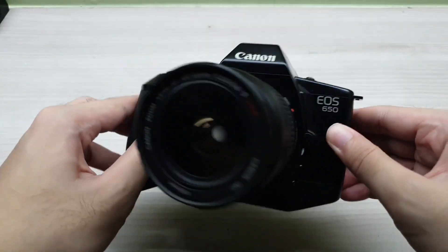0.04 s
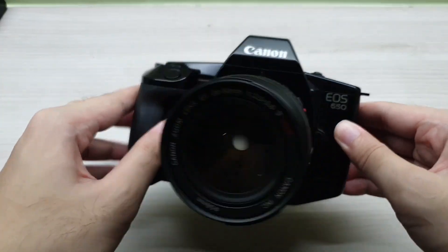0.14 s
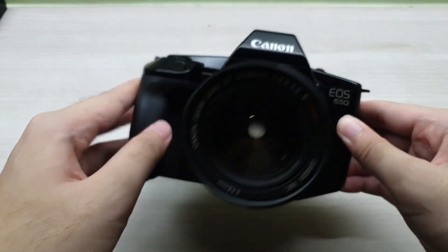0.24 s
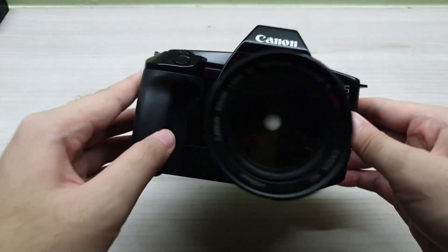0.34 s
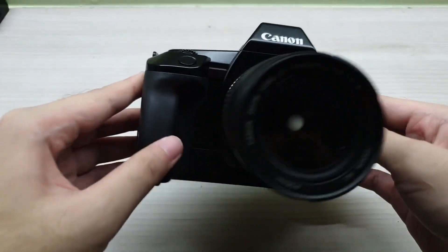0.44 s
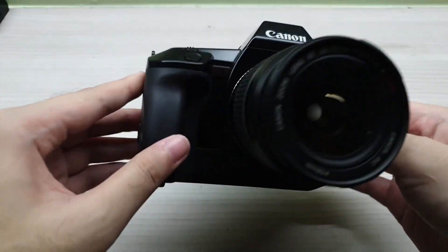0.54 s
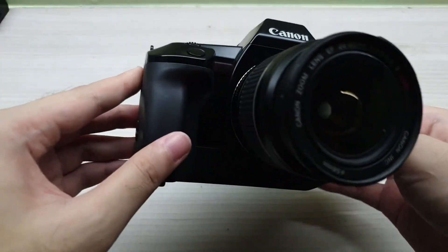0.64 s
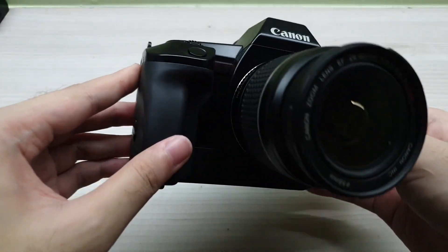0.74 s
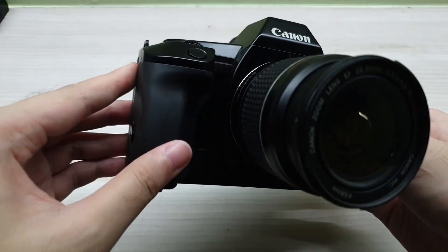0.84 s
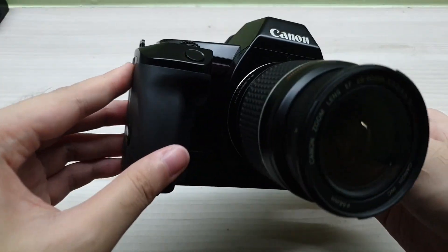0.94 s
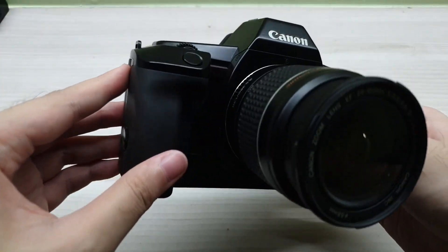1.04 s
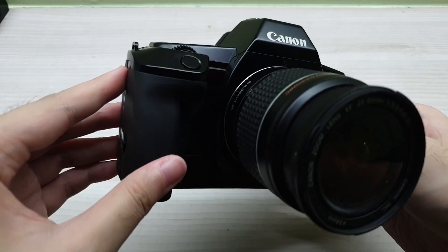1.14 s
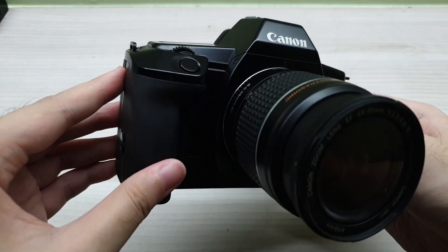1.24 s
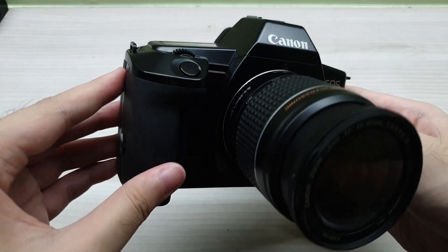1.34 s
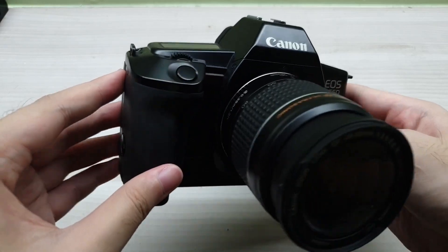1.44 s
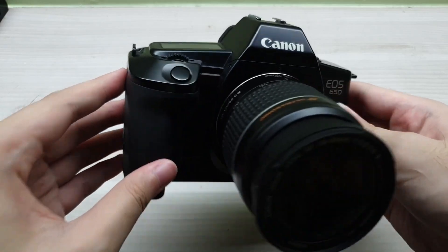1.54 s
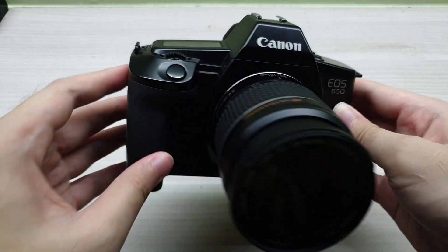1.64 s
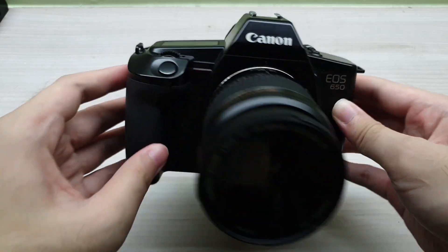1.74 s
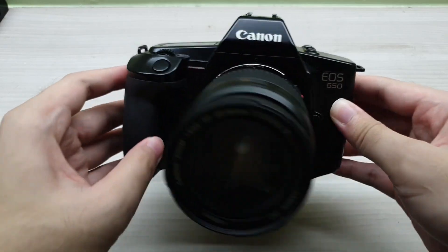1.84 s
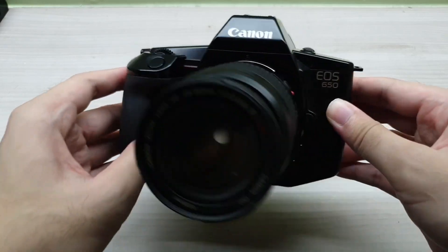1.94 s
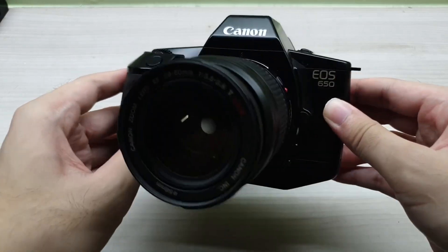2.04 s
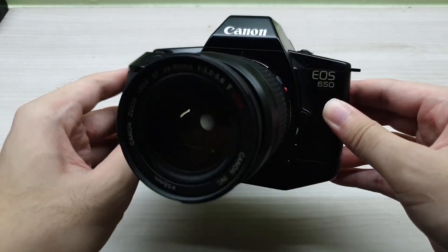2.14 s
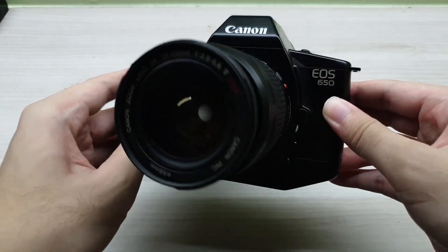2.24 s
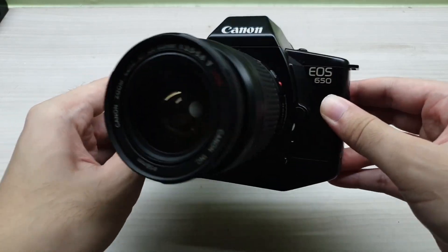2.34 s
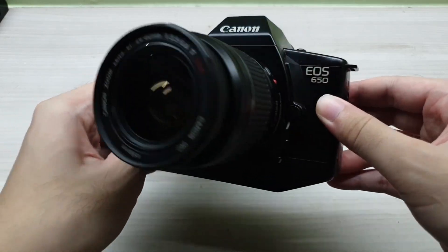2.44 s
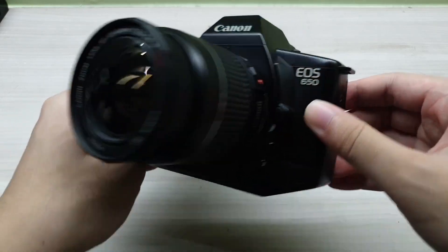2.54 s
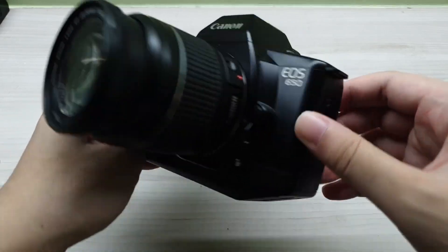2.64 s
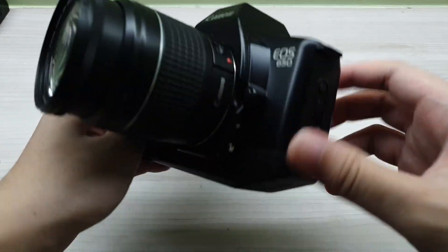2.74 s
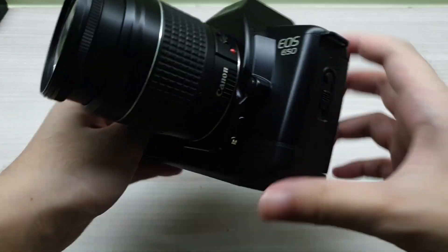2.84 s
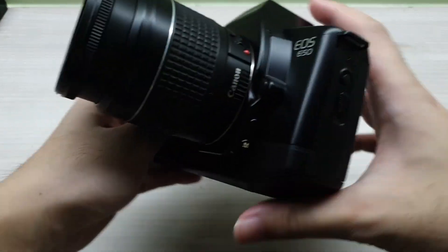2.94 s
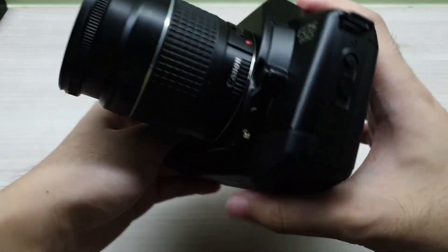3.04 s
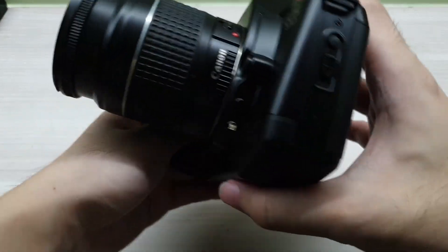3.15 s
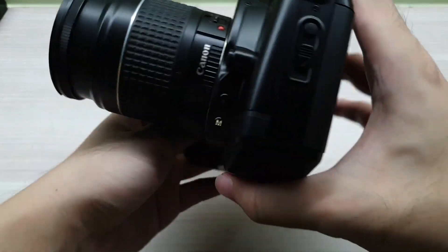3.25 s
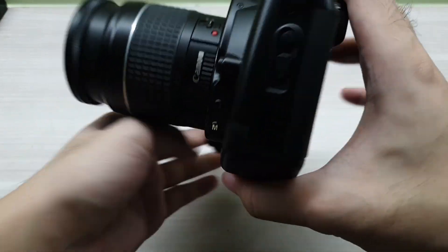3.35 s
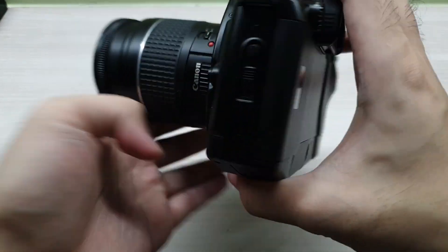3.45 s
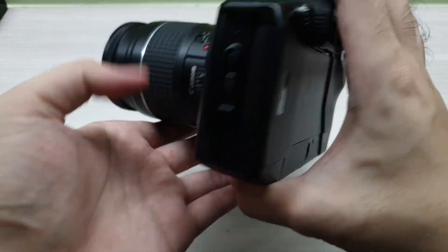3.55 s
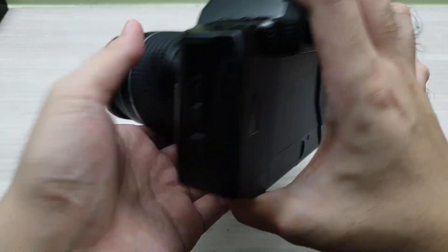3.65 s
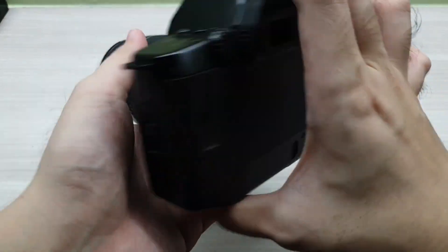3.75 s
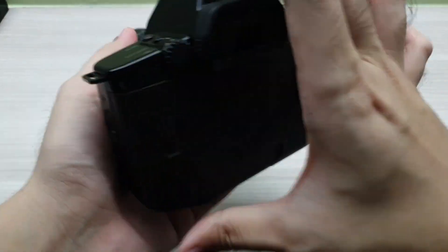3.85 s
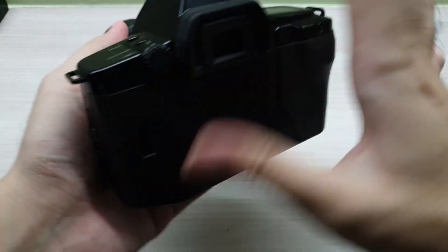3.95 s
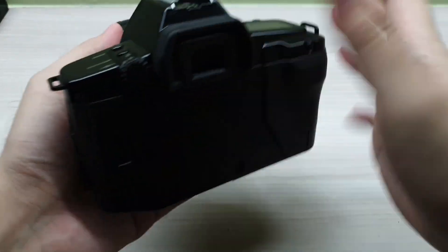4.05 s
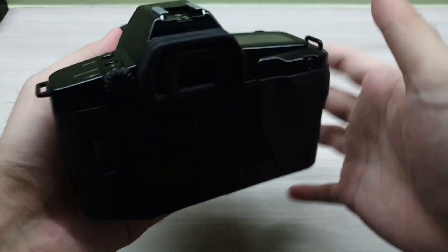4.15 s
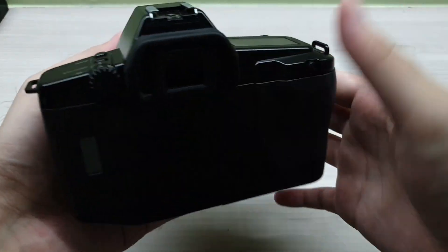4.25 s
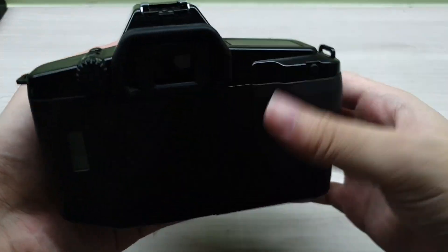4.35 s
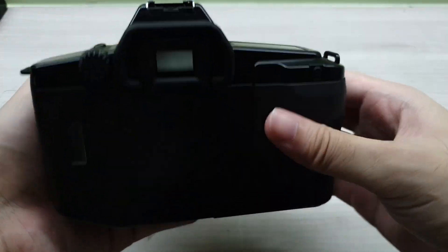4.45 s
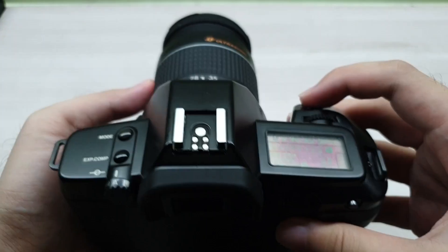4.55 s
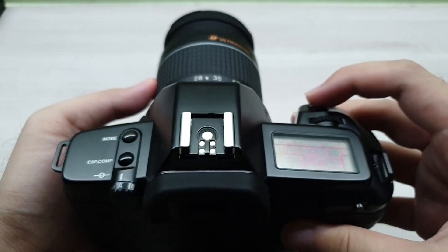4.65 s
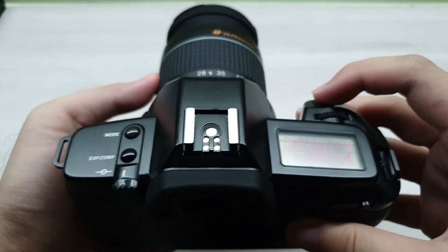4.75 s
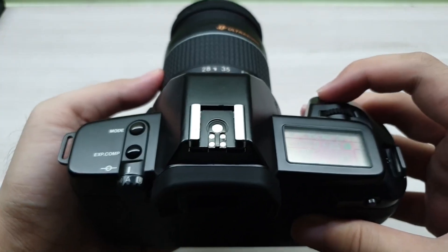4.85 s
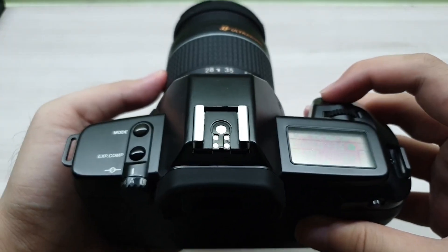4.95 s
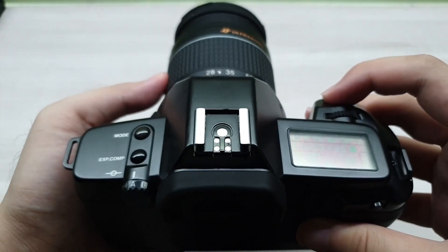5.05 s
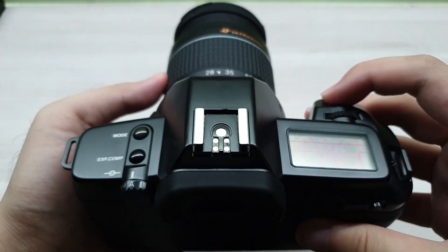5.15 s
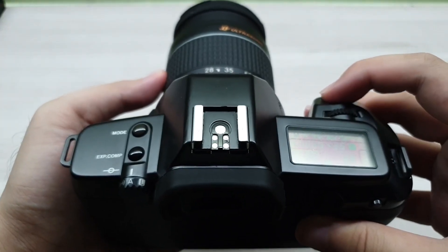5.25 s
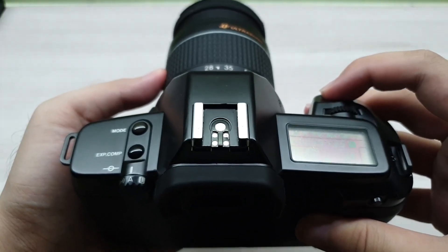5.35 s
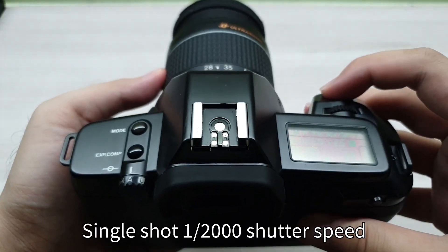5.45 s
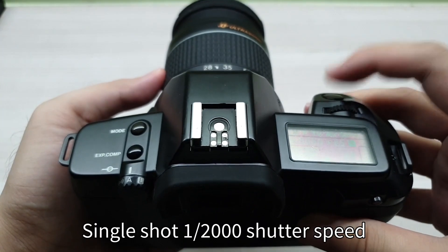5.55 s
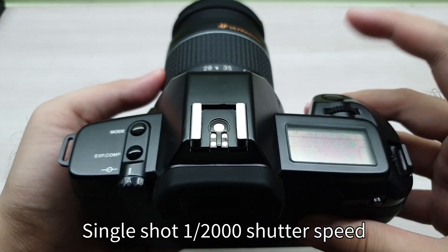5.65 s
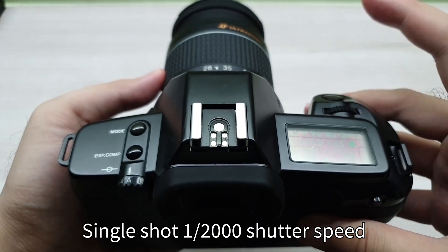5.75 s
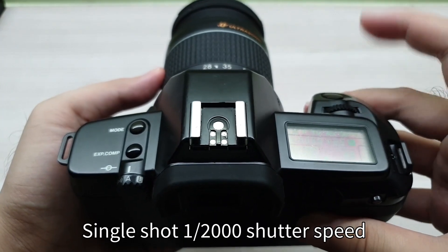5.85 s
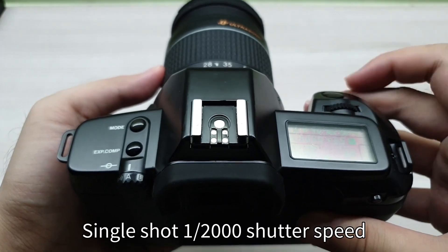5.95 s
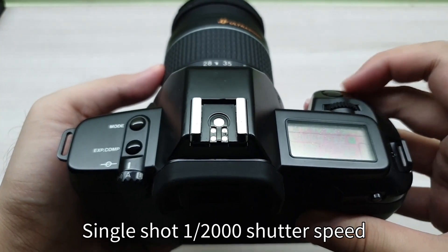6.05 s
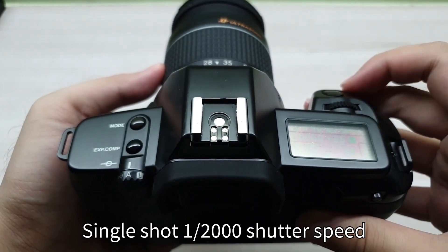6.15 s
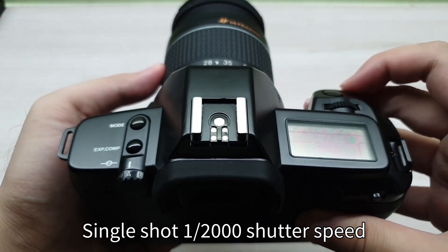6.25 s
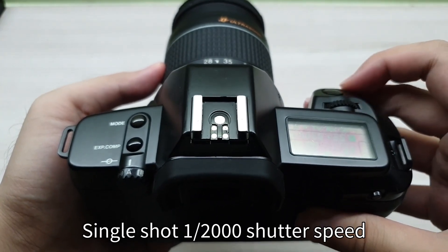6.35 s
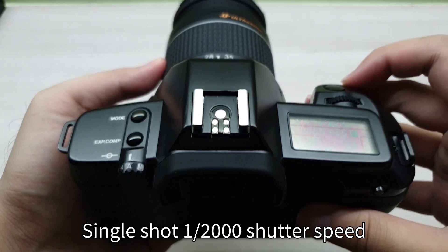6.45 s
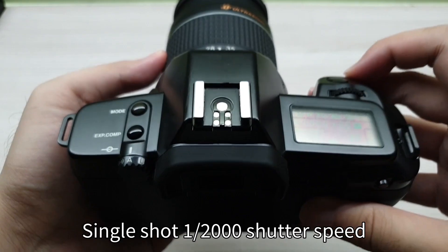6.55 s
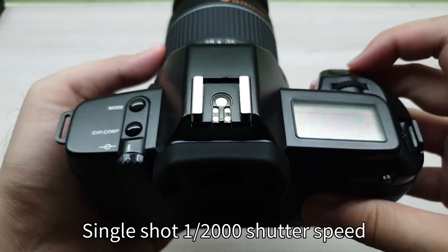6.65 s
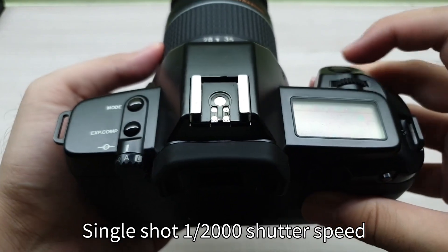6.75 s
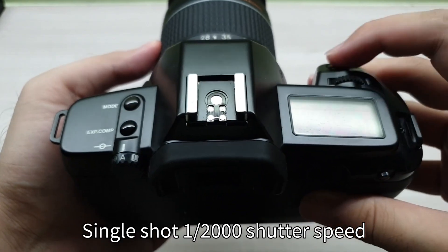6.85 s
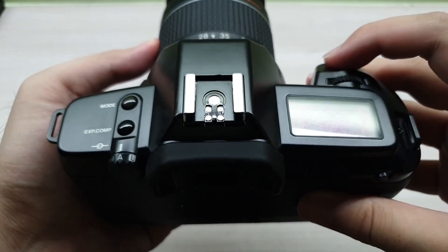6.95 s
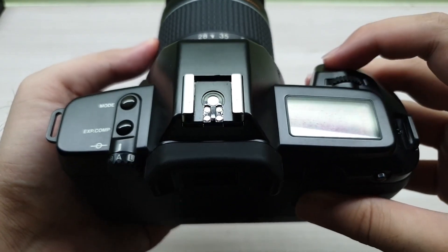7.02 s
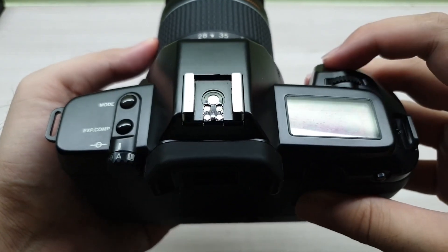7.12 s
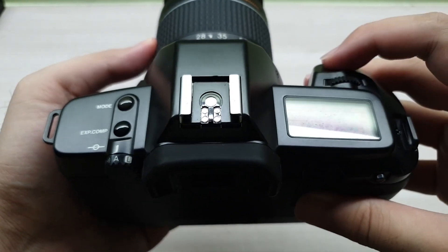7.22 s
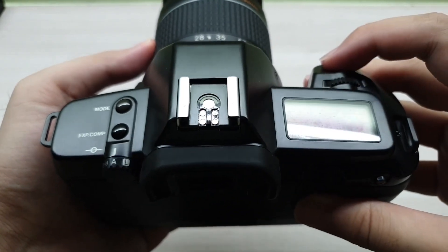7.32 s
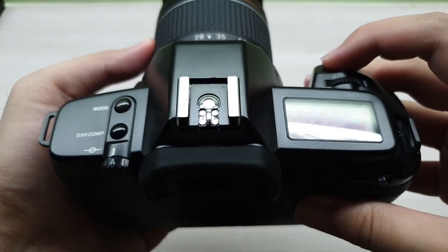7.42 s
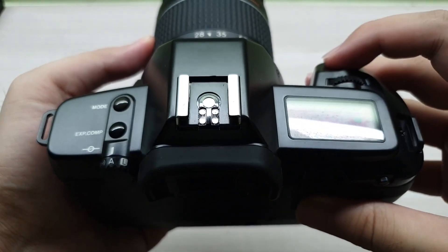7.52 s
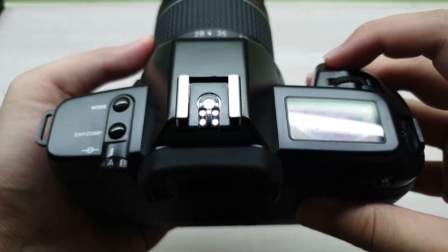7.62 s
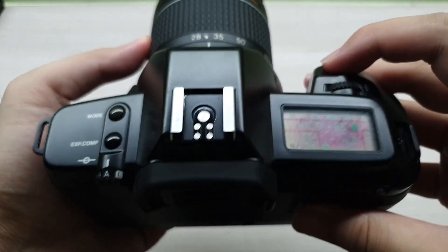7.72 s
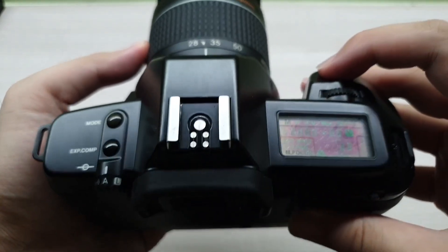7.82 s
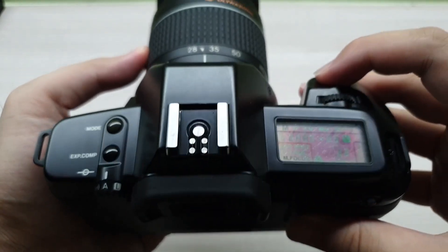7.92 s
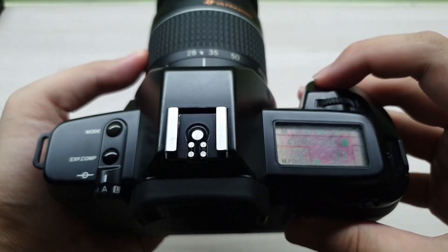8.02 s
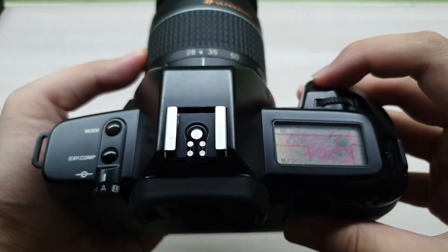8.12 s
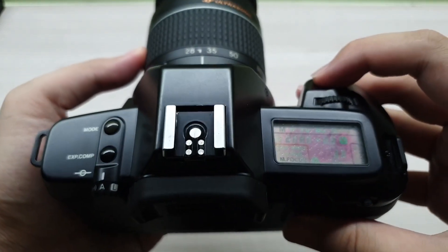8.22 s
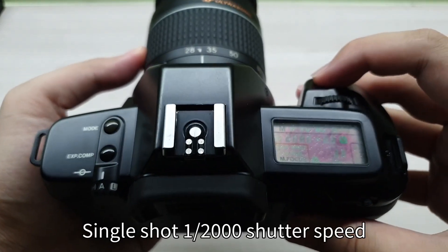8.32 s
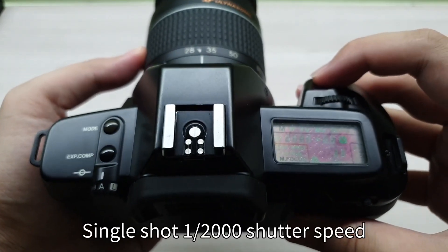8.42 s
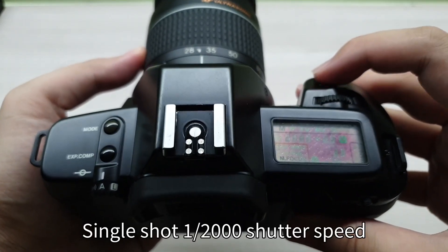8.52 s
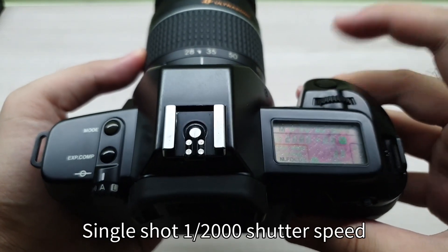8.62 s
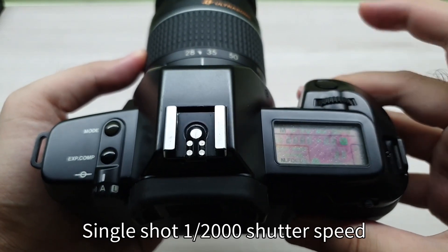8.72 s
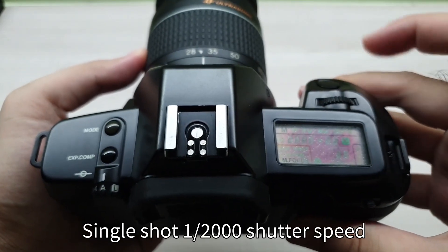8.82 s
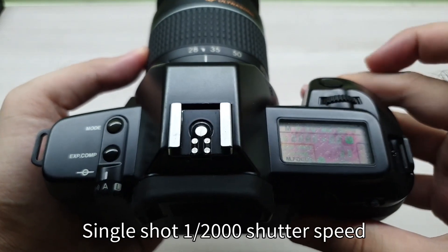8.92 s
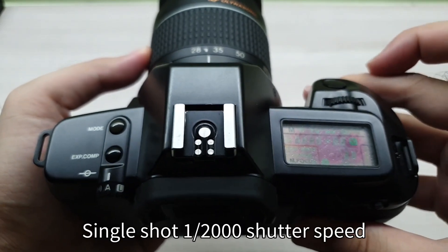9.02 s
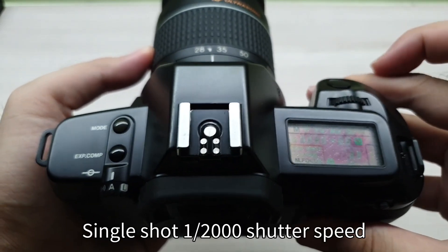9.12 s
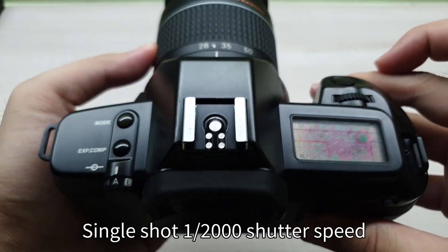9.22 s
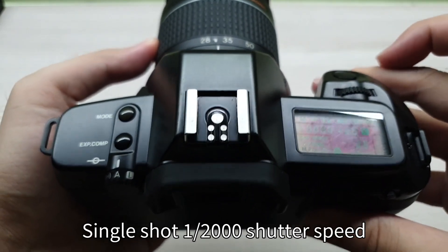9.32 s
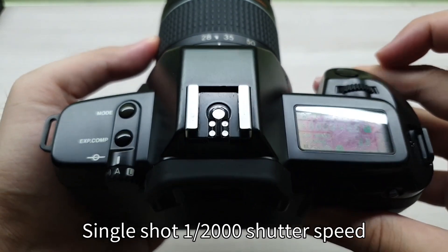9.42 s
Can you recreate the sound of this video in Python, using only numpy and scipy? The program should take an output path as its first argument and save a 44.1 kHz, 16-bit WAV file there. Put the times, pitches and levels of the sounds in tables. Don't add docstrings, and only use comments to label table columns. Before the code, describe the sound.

Close skin rubs, creaks and ticks on a camera body give way to two sharp, motorized shutter bursts about three seconds apart.

```python
import sys
import numpy as np
from scipy import signal
from scipy.fft import rfft, irfft, next_fast_len
from scipy.io import wavfile
from scipy.ndimage import uniform_filter1d

SR = 44100
rng = np.random.default_rng(int(sys.argv[2]) if len(sys.argv) > 2 else 0)


def level_to_linear(level):
    exponent = np.asarray(level, float) / 20
    return 10 ** exponent


def unload_wav(signal):
    wavfile.write(
        sys.argv[1],
        SR,
        np.round(np.clip(np.atleast_2d(signal).T, -1, 1) * 32767).astype(np.int16),
    )


N = 417911
TIME = np.arange(N) / SR

# (time [s], motor level [dB])
RELEASES = [
    (5.395, 1),
    (8.3546, 0.5),
]


def shape(x, table):
    hz, db = np.transpose(table)
    size = next_fast_len(N, True)
    f = np.arange(size // 2 + 1) * SR / size + 1
    gain = level_to_linear(np.interp(np.log(f), np.log(hz), db))
    return irfft(rfft(x, size) * gain, size)[..., :N]


def unit(x):
    return x / np.sqrt(np.mean(x ** 2))


def walk(rate, size=N):
    hold = int(SR / rate)
    steps = np.repeat(rng.standard_normal(size // hold + 1), hold)
    return 1.3 * uniform_filter1d(steps, hold)[:size]


def stirred():
    # (start [s], length [s], level [dB])
    gusts = [(0.175, 0.31, -44.5), (.55, 0.16, -53.5), (2.33, 0.22, -44.5), (2.575, 0.49, -52),
             (3.04, 0.29, -47), (3.4, 0.44, -63), (3.617, 0.37, -36), (3.928, 0.2, -38.5), (6.0, 0.22, -50),
             (8.6, 0.11, -60), (8.855, 0.24, -48.5), (9.081, 0.18, -49), (9.428, 0.22, -46)]
    still_air_db, drift_db = -58.5, 4
    power = level_to_linear(still_air_db + drift_db * uniform_filter1d(walk(17), size=2000)) ** 2
    for s, length, db in gusts:
        swell = np.sin(np.pi * np.clip((TIME - s) / length, 0, 1)) ** 2
        power = power + level_to_linear(db) ** 2 * swell
    return np.sqrt(power)


def background():
    # (frequency [Hz], level [dB per Hz])
    hiss_colour = [(13, -31), (22, -4), (45, -7), (65, -10.5), (110, -9.5), (266, -21.5), (306, -18.5),
                   (503, -23), (646, -23), (852, -28.5), (1260, -28), (4020, -42), (4610, -43),
                   (13600, -51), (15700, -53), (16500, -64.5)]
    # (frequency [Hz], level [dB])
    hums = [(2266, -88.5), (4533, -97), (6998, -96.5)]
    # (on [s], off [s], level [dB])
    whistle = [(0.553, 1.15, -95), (2.75, 2.95, -96), (4.55, 5.507, -90), (5.697, 5.9, -92.5),
               (6.009, 6.6, -89.5), (7.201, 8.5, -95), (8.702, 9.485, -96.5)]
    hiss_db, fan_hz, fan_db = -57.5, 2300, -81.5
    hiss = unit(shape(rng.standard_normal(N), hiss_colour)) * level_to_linear(hiss_db + 0.57 * walk(3.0))
    rumble = [(4, -21.0), (9, -5.0), (16, 10.0), (30, -0.5), (60, -6.5), (150, -62)]
    air = unit(shape(rng.standard_normal(N), rumble)) * stirred()
    hum = sum(level_to_linear(db + 7 + 1.7 * walk(6)) * np.sin(2 * np.pi * hz * TIME) for hz, db in hums)
    on = sum(level_to_linear(db) * ((TIME > t0) & (TIME < t1)) for t0, t1, db in whistle)
    level = uniform_filter1d(on, size=6000) * level_to_linear(7 + 1.5 * walk(8))
    tone = level * np.sin(2 * np.pi * 8000 * TIME)
    narrow = [(fan_hz / 1.15, -30), (fan_hz, 0), (fan_hz * 1.15, -30)]
    fan = unit(shape(rng.standard_normal(N), narrow)) * level_to_linear(fan_db)
    return hiss + fan + air + hum + tone


def slides():
    # (start [s], length [s], level [dB], centre [Hz], fade [dB per s])
    rubs = [(0.185, .04, -71, 5000, 100), (0.22, .02, -72, 5500, 100), (0.294, .06, -79, 9500, -40),
            (1.935, 0.05, -73, 5170, 20), (1.932, .06, -74, 2000, 20), (2.02, 0.077, -67, 7000, 146),
            (2.138, 0.057, -77.5, 7000, 10), (2.665, 0.087, -62, 3250, 157), (2.789, 0.019, -58, 2600, 23),
            (2.954, 0.099, -55, 3400, 15), (2.958, 0.11, -61, 5100, 10), (2.944, 0.076, -59, 7300, 20),
            (3.008, 0.093, -69, 2440, 5), (3.216, 0.14, -55, 3920, 100), (3.412, 0.062, -74, 6030, -20),
            (3.471, 0.14, -58, 5000, 62), (3.485, 0.074, -66, 10500, 30), (3.554, 0.054, -75, 10500, -10),
            (3.466, 0.024, -55, 1990, 100), (3.728, 0.11, -64, 1550, -10), (3.751, 0.019, -61, 7440, -10),
            (3.773, .05, -64.5, 3020, -10), (3.787, 0.086, -84, 10500, 5), (3.836, 0.049, -58, 2670, -48),
            (3.842, 0.047, -66, 5200, 10), (4.428, 0.052, -73.5, 7000, 50), (6.12, 0.023, -75, 3580, 50),
            (6.775, 0.12, -77.5, 6000, 52)]
    slide_on_s, slide_off_s, airy_db = 0.021, 0.044, -15.5
    skin_focus_db = 32
    grain = rng.standard_normal(N) * level_to_linear(1.5 * rng.exponential(size=N)) * level_to_linear(.8 * walk(120))
    centres = np.array([1600, 2400, 3260, 5150, 7300, 11000])
    bands = []
    for hz in centres:
        colour = [(hz / 2, -34), (hz / 1.12, -9), (hz, 0), (hz * 1.12, -9), (hz * 1.9, -25)]
        bands.append(unit(shape(grain, colour)) * level_to_linear(1.8 * walk(60)))
    top = unit(shape(grain, [(5000, -10), (8000, -4), (13000, -18), (15500, -26), (16200, -32)]))
    out = np.zeros(N)
    for s, length, db, hz, fade_db in rubs:
        part = slice(int(s * SR), int((s + length + slide_off_s) * SR))
        t = TIME[part] - s
        press = np.clip(np.minimum(t / slide_on_s, 1 + (length - t) / slide_off_s), 0, 1)
        touch = press ** 2 * level_to_linear(db - fade_db * t)
        share = level_to_linear(-skin_focus_db * np.log2(hz / centres) ** 2)
        share = share / np.sqrt((share ** 2).sum(axis=0))
        body = sum(w * b[part] for w, b in zip(share, bands))
        out[part] += touch * (body + level_to_linear(airy_db) * hz / 4000 * top[part])
    return out


def ring(push, modes, chance):
    t = TIME[:len(push)]
    reply = 0
    for (hz, db, t60), c in zip(modes, chance):
        tone = np.sin(2 * np.pi * hz * (1 + 0.022 * c) * t)
        reply = reply + level_to_linear(db + 0.5 * c) * tone * 1000 ** (-t / t60)
    y = signal.fftconvolve(push, reply)[:len(push)]
    return y / np.abs(y).max()


def strike(rows, ring_db, ring_t60, after_db, focus_db, size=3072):
    # (frequency [Hz], level [dB], t60 [s])
    clack_modes = [(1240, -17.5, 0.0055), (2100, -15, 0.0093), (2600, -7, 0.036), (2700, -3.5, 0.008),
                   (3060, -2, .007), (3540, 3.5, 0.0054), (4400, 0.5, 0.007)]
    snap_modes = [(5250, -5.5, 0.0036), (6357, 0, 0.0061), (7280, 4.5, 0.0028), (8350, -2.5, 0.002),
                  (9500, 3, 0.0019), (11600, -2, 0.0022), (12500, -6, 0.001), (15000, -6, 0.00071)]
    out, t = np.zeros(N + size), TIME[:size]
    luck = rng.standard_normal((len(rows), size + 32))
    for (s, db, hz, snap_db, t60, rise_s), c in zip(rows, luck):
        fall = 1000 ** (-t / np.clip(t60, .002, .1)) + level_to_linear(after_db) * np.exp(-t / .008)
        chatter = (1 - np.exp(-t / max(rise_s, 5e-5))) ** 2 * fall * c[32:]
        clack, snap = ([(f, d - focus_db * abs(np.log2(f / hz)), r) for f, d, r in modes]
                       for modes in (clack_modes, snap_modes))
        y = ring(chatter, clack, c) + level_to_linear(snap_db) * ring(chatter, snap, c[8:])
        own_db = ring_db + (hz > 5000) * snap_db
        y += level_to_linear(own_db) * ring(chatter, [(hz, 0, ring_t60)], c[24:])
        start = int(s * SR)
        out[start:start + size] += level_to_linear(db + max(snap_db, 0)) * y / np.abs(y).max()
    no_bass = signal.butter(3, 900, "high", fs=SR, output="sos")
    return signal.sosfilt(no_bass, out[:N])


def handling(size=12288):
    # (time [s], level [dB], ring [Hz], snap [dB])
    creaks = [(.1982, -52, 3000, 8), (.227, -39, 3040, 3), (.238, -47, 4930, 6), (.4348, -62, 7300, 17.5),
              (1.212, -40, 2460, -13), (2.023, -32.5, 4400, 6.5), (2.318, -38, 3300, -20),
              (2.334, -40.5, 3340, -25), (2.3643, -46, 4930, 9.5), (2.57, -27, 8000, 1),
              (2.652, -52, 4800, 11), (2.6672, -28, 2870, -1), (2.806, -46, 2300, -15),
              (2.811, -41, 2170, -12), (2.8155, -38, 2100, -23), (2.82, -51, 2880, -10),
              (3.1035, -50, 2100, -30), (3.1551, -43.5, 7140, 4.5), (3.1605, -46, 4500, -5),
              (3.1935, -53, 5270, 9), (3.229, -29, 1820, -6), (3.2364, -44, 8000, 5),
              (3.2405, -45, 6450, 2), (3.2458, -34.5, 1780, -2), (3.26, -36, 4920, -9),
              (3.2908, -41, 5540, 2), (3.4909, -40.5, 3500, 6.5), (3.8352, -43.5, 4500, 6),
              (3.9164, -47.5, 9500, 6.5), (4.059, -45.5, 2340, -30), (4.316, -49, 3470, 0.5),
              (4.7612, -34.5, 6600, 2), (4.8765, -52.5, 2180, 11.5), (6.146, -43.5, 1520, 0),
              (6.7732, -38, 2187, 4.5)]
    # (time [s], level [dB])
    ticks = [(.358, -56), (0.668, -57), (.72, -60), (1.6298, -55), (1.705, -55), (1.942, -51.5),
             (2.402, -53.5), (2.553, -55), (2.801, -52), (2.8766, -50), (2.9244, -58), (3.1264, -57),
             (3.666, -55), (3.682, -48), (3.907, -41), (4.547, -59), (4.656, -49), (6.733, -61),
             (6.799, -58), (6.808, -53)]
    # (time
    # [s], level [dB], frequency [Hz], t60 [s])
    tones = [(.199, -56, 1200, .02), (.239, -54, 5000, .02), (1.212, -50, 4600, .017),
             (2.572, -69, 3450, .12), (2.572, -64, 4960, .22), (3.157, -57, 7250, .06),
             (4.762, -51, 3200, .05), (6.147, -55, 5500, .02), (6.775, -51, 3400, .03),
             (6.775, -47, 2080, .035), (9.12, -62.5, 7600, .05), (.228, -44, 3000, .015),
             (.24, -52, 1100, .015), (1.212, -48, 2200, .015), (2.0232, -41, 8800, .01),
             (2.0232, -44, 5200, .008), (3.261, -48, 5150, .02), (4.7615, -38, 6900, .012),
             (4.7615, -42, 3150, .012), (4.692, -58, 4500, .012), (6.7735, -48, 7900, .02),
             (6.799, -55, 1300, .012), (6.807, -57, 6000, .012)]
    tick_hz, tick_snap_db = 4080, 2
    creak_t60_s, sharp_s = 0.0055, .0001
    pings, t = np.zeros(N + size), TIME[:size]
    for s, db, hz, t60 in tones:
        start = int(s * SR)
        pings[start:start + size] += level_to_linear(db) * 1000 ** (-t / t60) * np.sin(2 * np.pi * hz * t)
    rows = creaks + [(s, db, tick_hz, tick_snap_db) for s, db in ticks]
    rows = [(*row, creak_t60_s, sharp_s) for row in rows]
    return strike(rows, ring_db=1.0, ring_t60=0.0039, after_db=-14, focus_db=8.5) + pings[:N]


def knocks(size=6144):
    # (time [s], peak [dB], ring [Hz], t60 [s])
    hand_knocks = [(.227, -51, 750, 0.027), (1.21, -48, 523, 0.025), (1.629, -47, 398, 0.019),
                   (1.706, -47, 530, 0.02), (1.941, -36, 705, 0.039), (1.963, -47, 715, 0.063),
                   (1.995, -50, 650, 0.027), (2.363, -42, 725, 0.046), (2.552, -37, 437, 0.02),
                   (2.57, -27, 460, 0.021), (2.663, -42, 605, 0.018), (2.668, -33, 1100, 0.023),
                   (2.711, -46, 517, 0.044), (2.717, -49, 560, .03), (2.742, -49, 560, 0.018),
                   (2.749, -41.5, 570, 0.017), (2.758, -46, 650, 0.022), (2.764, -56, 560, .02),
                   (2.8, -38.5, 516, 0.03), (2.805, -40, 753, 0.049), (2.81, -44, 690, 0.035),
                   (2.817, -41, 605, 0.029), (2.825, -47, 800, .02), (3.103, -40.5, 1450, 0.013),
                   (3.238, -35.5, 475, 0.058), (3.244, -46, 452, 0.057), (3.258, -40.5, 700, 0.056),
                   (3.493, -43.5, 409, 0.068), (4.058, -35, 380, 0.055), (4.658, -39, 457, 0.014),
                   (4.764, -47, 514, 0.052), (6.147, -45.5, 960, 0.029)]
    # (time after release [s], peak [dB], ring [Hz], thud [dB], t60 [s])
    thumps = [(0, -39.5, 1144, -20.5, 0.02), (0.049, -26, 952, -10, .02), (0.067, -28.5, 920, -10.5, .025),
              (.074, -20, 539, -6.5, 0.048), (0.1046, -13.5, 578, -27.5, 0.049),
              (0.1643, -10.5, 403.1, -7, 0.04), (.192, -15, 520, -6.5, .03), (0.212, -24, 546, -14, 0.019),
              (0.316, -35, 535, -21, 0.072)]
    # (frequency [Hz], level [dB], t60 [s])
    thud_modes = [(57.4, -3, 0.079), (110, 1, 0.066), (177, 7.5, .03)]
    shake_db = -15.25
    soft_cycles = 0.85
    out, t = np.zeros(N + size), TIME[:size]
    rows = [(s, db, hz, shake_db, t60) for s, db, hz, t60 in hand_knocks]
    rows += [(s + since, *rest) for s, _ in RELEASES for since, *rest in thumps]
    for (s, db, hz, thud_db, t60), c in zip(rows, rng.standard_normal((len(rows), 8))):
        neighbours = hz * np.array([.7, 1.35, 1.8, 2.4])
        wall = [(hz, 0, max(t60, .005))] + [(f, -4, .012) for f in neighbours]
        if thud_db == shake_db:
            push = np.sin(np.pi * np.clip(t * hz / soft_cycles, 0, 1)) * np.sin(2 * np.pi * hz * t)
        else:
            push = t * np.exp(-t / .00015)
        thud = ring(t * np.exp(-t / 0.0005), thud_modes, c[4:])
        start = int(s * SR)
        out[start:start + size] += level_to_linear(db) * (ring(push, wall, c) + level_to_linear(thud_db) * thud)
    return out[:N]


def shutter():
    # (time after release [s], peak [dB], ring [Hz], snap [dB], rise [s])
    blows = [(-.0016, -8.5, 3019, 0.5, .0012), (.006, -28, 2502, -3, .002),
             (0.016, -23.5, 2839, -5, 0.00055), (.03, -18.5, 2788, -7, .0003),
             (0.0433, -26.5, 2300, -5, .0005), (.049, -17, 2500, -9.5, .0005),
             (0.057, -12, 3003, 0.5, .001), (0.0614, -17, 3137, 3.5, .001), (0.066, -2, 3405, 1, .001),
             (.072, -5.5, 2390, 6, .0007), (0.0821, -16, 2808, -4.5, .0005), (0.094, -10.5, 3100, 5, .003),
             (.104, -1.5, 2714, -5, .0012), (0.135, -13.5, 2994, 5.5, .001), (.144, -17.5, 2500, 4, .00045),
             (0.1647, -2, 2714, 5.5, .0005), (0.1645, -4.5, 9390, 8.5, .0004),
             (0.1768, -12.5, 2581, 0.5, 0.00033), (0.191, -9.5, 3110, 2, .001),
             (.194, -12.5, 6510, 9, .001), (0.2118, -16, 2636, 2.5, .00044)]
    blow_t60_s = .013
    rows = [(s + since, db - max(snap_db, 0), hz, snap_db, blow_t60_s, rise_s)
            for s, _ in RELEASES for since, db, hz, snap_db, rise_s in blows]
    return strike(rows, ring_db=-13.5, ring_t60=0.014, after_db=-19, focus_db=0.5)


def motor():
    # (multiple of the shaft speed [1], level [dB])
    whine_lines = [(1, -15), (2, -30), (3, -5), (4, -22.5), (5, -17.5), (6, -15), (7, -20.5), (8, -26),
                   (9, -16.5), (10, -9), (11, -10), (12, -16), (13, -1.5), (14, -3), (15, -0.5), (16, -7),
                   (17, -14.5), (18, -8), (19, -13.5), (20, -15.5), (21, -10), (22, -18.5), (23, -21),
                   (24, -22), (25, -18), (26, -22), (27, -22)]
    # (frequency [Hz], level [dB per Hz])
    gears = [(150, -21.5), (400, -19.5), (800, -22), (1300, -17.5), (2000, -13), (2500, -7), (3300, -12),
             (4800, -15.5), (6500, -7), (8000, -11), (9800, -12), (11200, -23.5), (15300, -28.5),
             (16500, -51.5)]
    # (time after release [s], shaft [Hz])
    speed = [(.017, 105), (.055, 172), (.085, 187), (.115, 133), (.143, 164), (.175, 175), (.2, 176.6),
             (.28, 176.2), (.31, 168)]
    grip_s, cut_s, coast_db_per_s = 0.0033, 0.317, 1200
    winds_s, shift_s = 0.15, 0.06
    mirror_db, film_db = (-41, -30), (-32, -30.5)
    labour_db = -4
    since, hz = np.transpose(speed)
    teeth = rng.standard_normal(N) * level_to_linear(1.5 * rng.exponential(size=N)) * (rng.random(N) < .4)
    rattle = unit(shape(teeth, gears)) * level_to_linear(1.5 * walk(150))
    out = np.zeros(N)
    for s, db in RELEASES:
        part = slice(int((s + since[0]) * SR), int((s + cut_s + 60 / coast_db_per_s) * SR))
        t = TIME[part] - s
        size = len(t)
        shaft_hz = np.interp(t, since, hz) * (1 + .0008 * walk(60, size=size))
        turn = 2 * np.pi * np.cumsum(shaft_hz) / SR
        whine = 0
        for k, d in whine_lines:
            angle = k * turn + rng.random() * 2 * np.pi + .025 * k * walk(140, size=size)
            whine = whine + level_to_linear(d + 2.6 * walk(80, size=size)) * np.sin(angle)
        throb = 1 + 0.29 * np.sin(turn)
        coast = coast_db_per_s * np.maximum(t - cut_s, 0)
        power = np.clip((t - since[0]) / grip_s, 0, 1) * level_to_linear(db - coast)
        change = [winds_s - shift_s, winds_s + shift_s]
        whine_db, rattle_db = (np.interp(t, change, pair) for pair in zip(mirror_db, film_db))
        whine_db = whine_db + np.interp(t, since[-2:], [0, labour_db])
        out[part] = power * (whine * level_to_linear(whine_db) + throb * rattle[part] * level_to_linear(rattle_db))
    return out


def scene():
    # (frequency [Hz], level [dB])
    room = [(100, -11.5), (500, -6.5), (1200, 4.5), (2500, -5.5), (4500, -4.5), (6800, -3), (10000, -11.5),
            (16000, -18)]
    # (from [s], to [s])
    flits = [(2.66, 2.68), (3.3, 3.95), (5.393, 5.525), (5.562, 5.58), (8.375, 8.47), (8.525, 8.57)]
    room_db, room_t60_s = -15, 0.53
    near = shutter() + handling() + knocks() + motor() + slides()
    tail = rng.standard_normal(N) * 1000 ** (-TIME / room_t60_s) * (1 - np.exp(-TIME / 0.0024))
    tail = shape(tail / np.sqrt(np.sum(tail ** 2)), room)
    mid = near + level_to_linear(room_db) * signal.fftconvolve(near, tail[:SR])[:N] + background()
    moving = level_to_linear(-24 + 4 * walk(20)) + sum((TIME > t0) & (TIME < t1) for t0, t1 in flits)
    treble = shape(mid, [(2000, -60), (4000, 0)])
    side = shape(treble * moving * walk(1500), [(4200, -90), (5000, -11.5), (8000, -11.5), (16000, -8)])
    return np.array([mid + side, mid - side])


def top_cut(x):
    return signal.sosfilt(signal.butter(12, 16830, fs=SR, output="sos"), x)


def record(dry):
    top = signal.ellip(8, .2, 60, 15850, fs=SR, output="sos")
    mix = np.clip(signal.sosfilt(top, dry), -1, 1)
    return top_cut(mix)


dry = scene()
out = record(dry)
unload_wav(out)
```